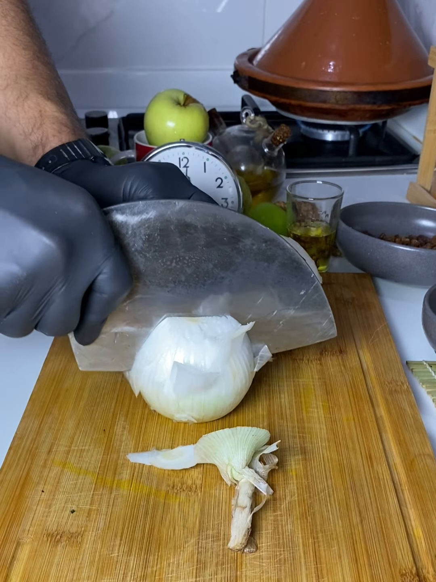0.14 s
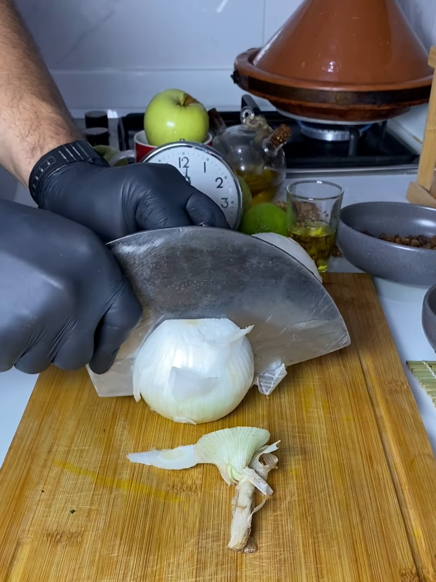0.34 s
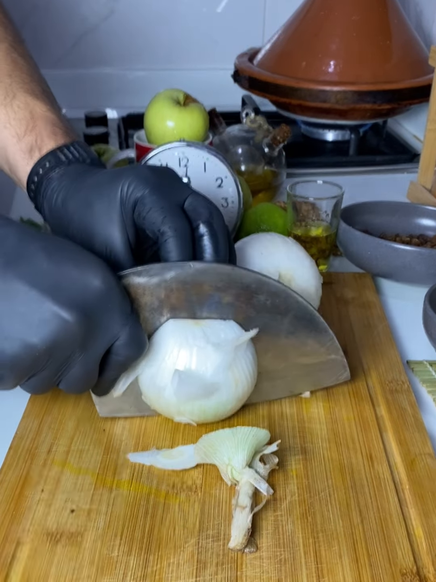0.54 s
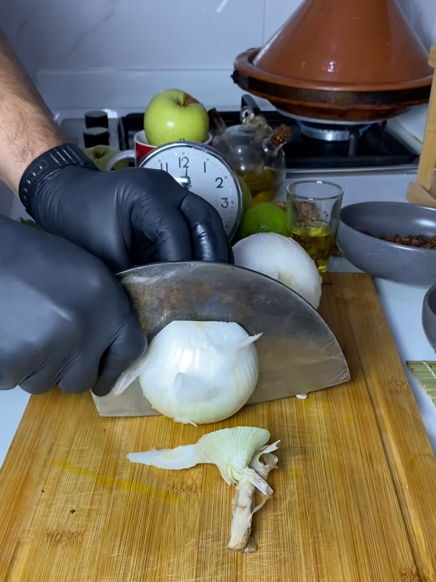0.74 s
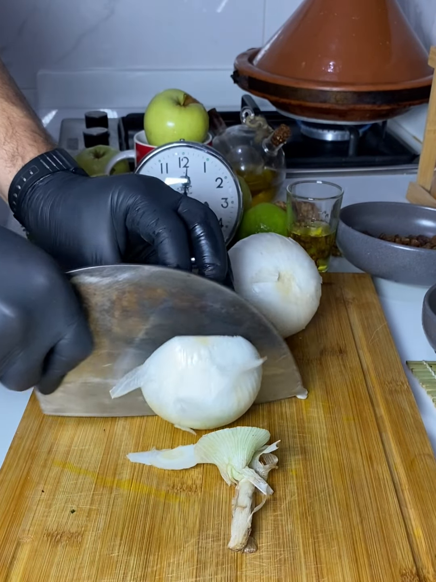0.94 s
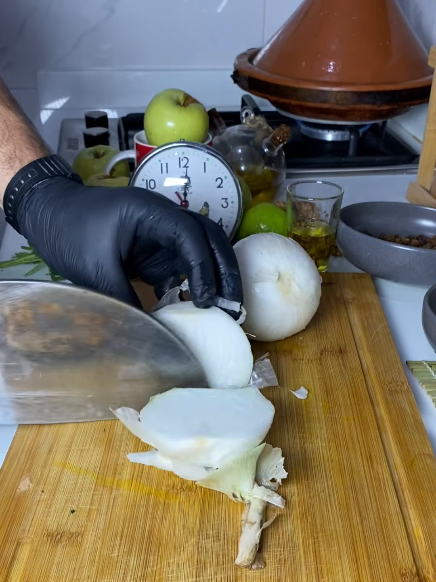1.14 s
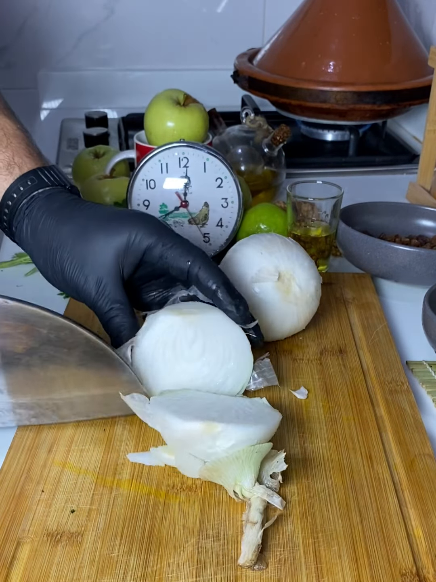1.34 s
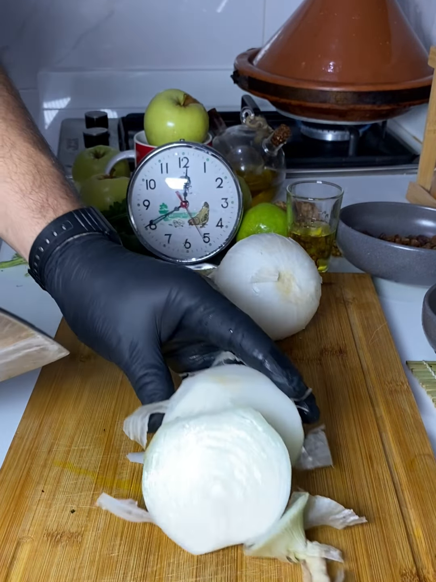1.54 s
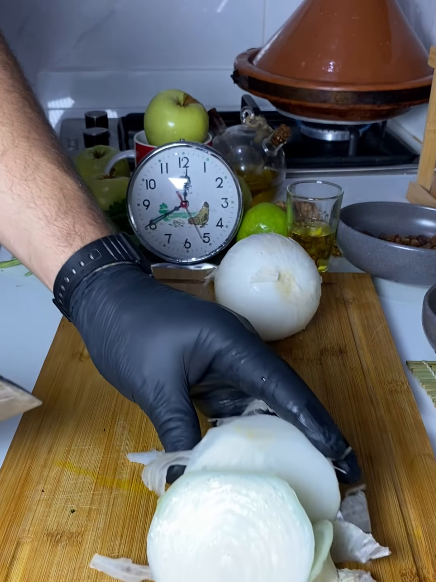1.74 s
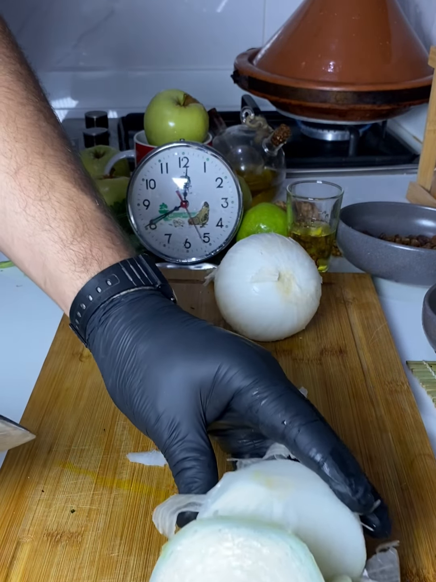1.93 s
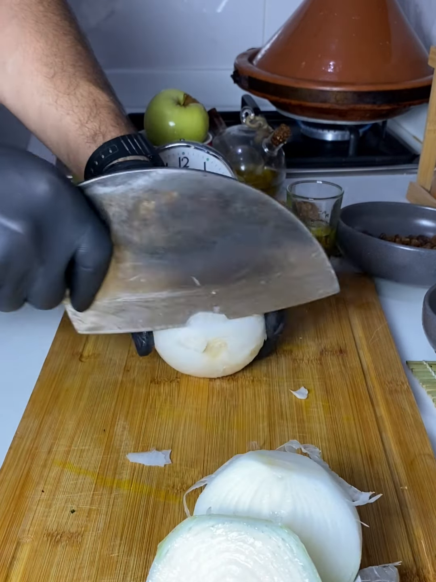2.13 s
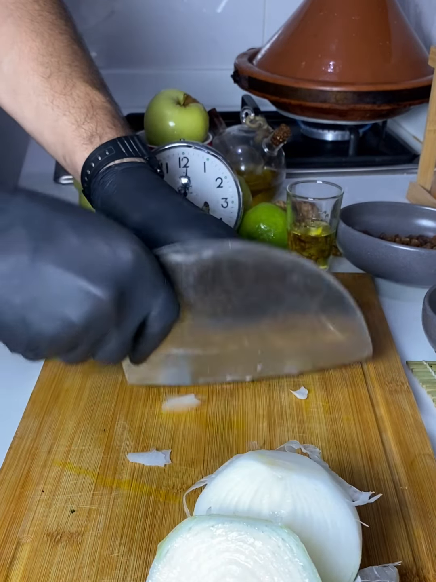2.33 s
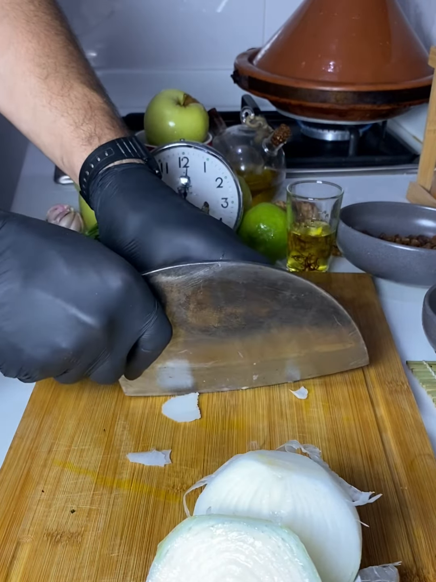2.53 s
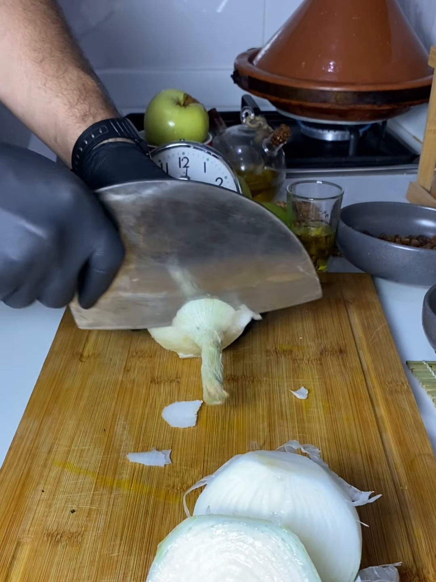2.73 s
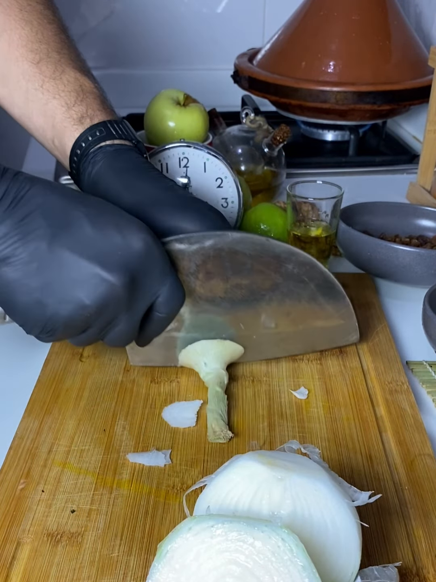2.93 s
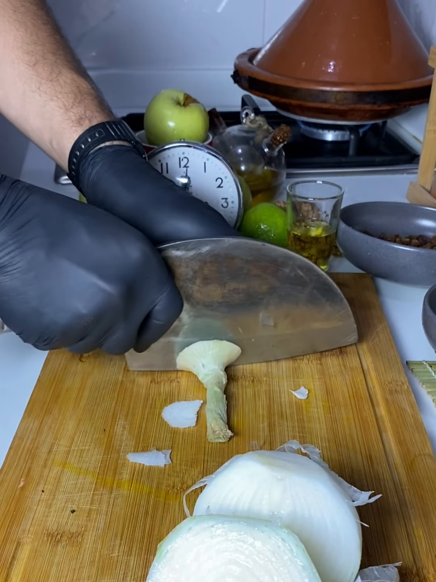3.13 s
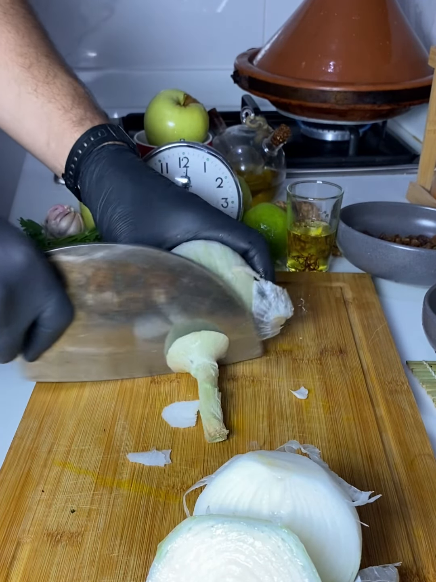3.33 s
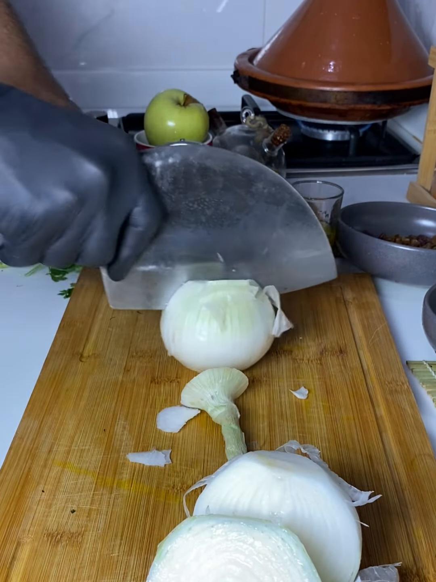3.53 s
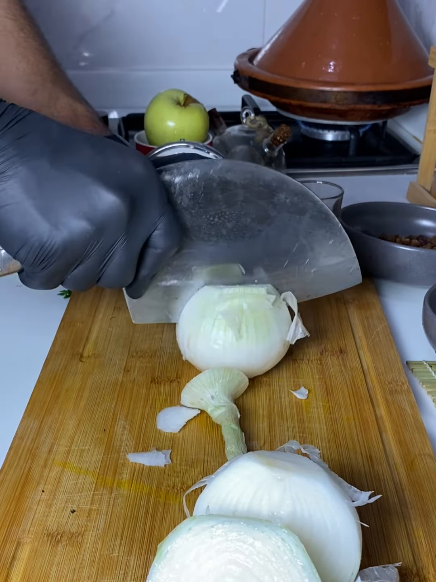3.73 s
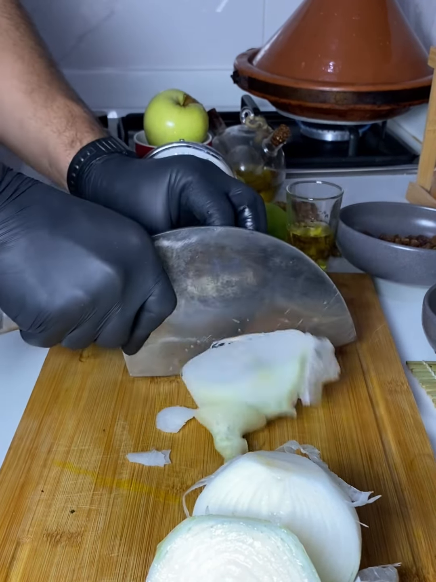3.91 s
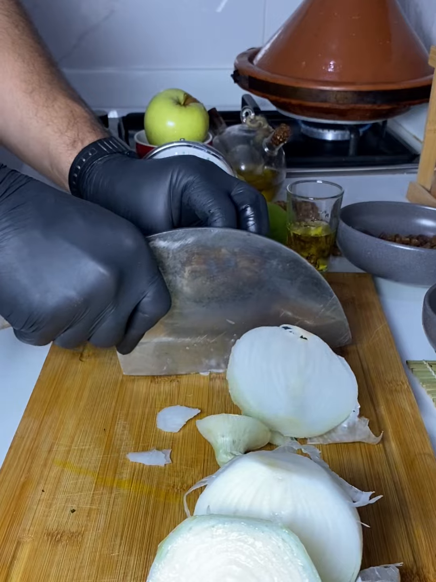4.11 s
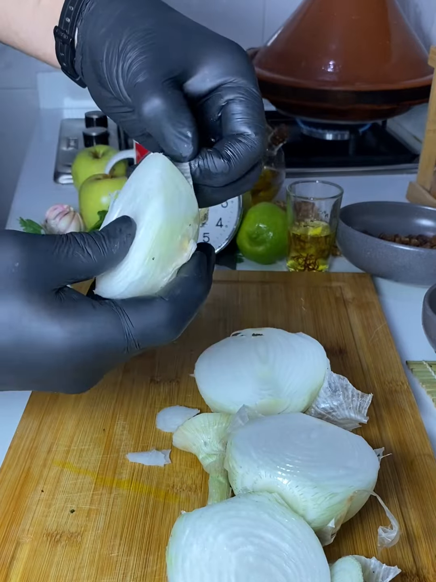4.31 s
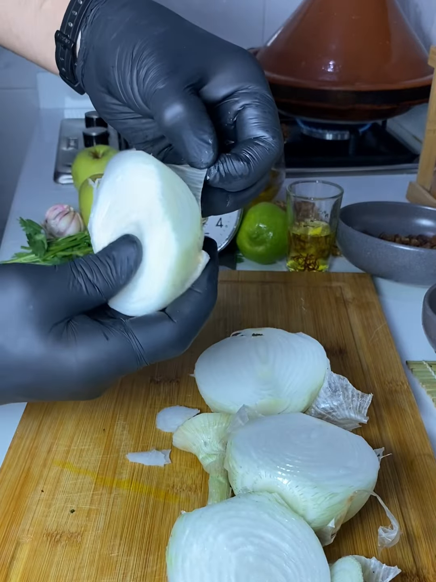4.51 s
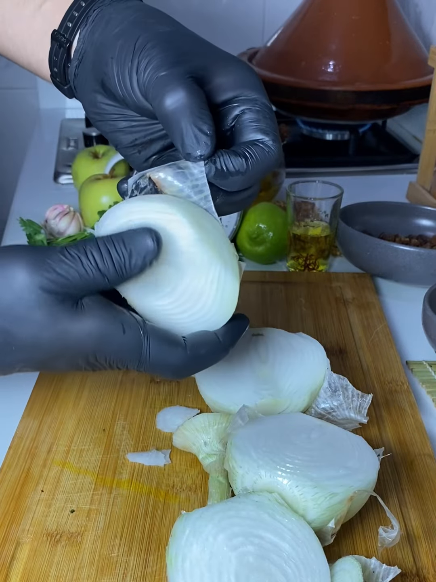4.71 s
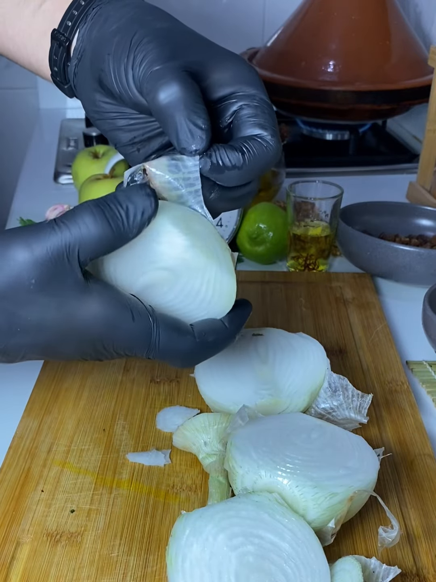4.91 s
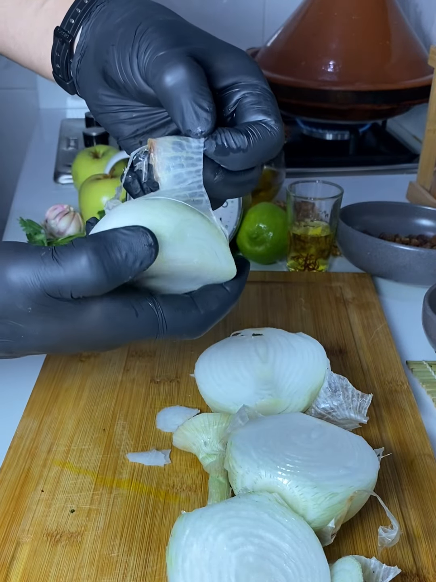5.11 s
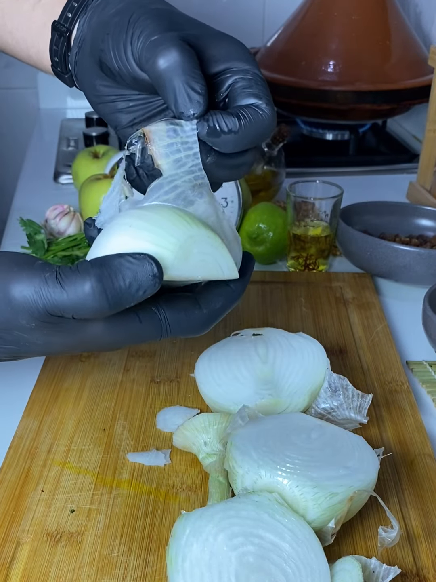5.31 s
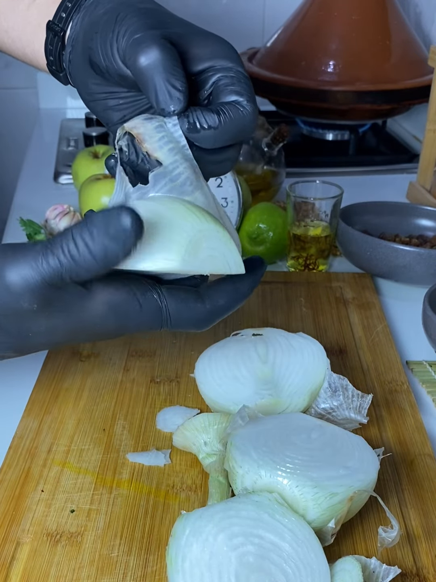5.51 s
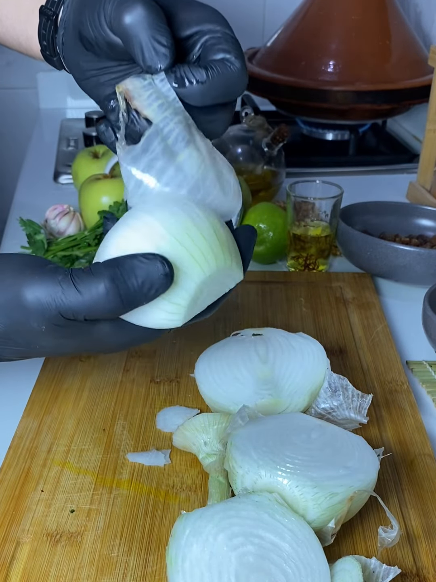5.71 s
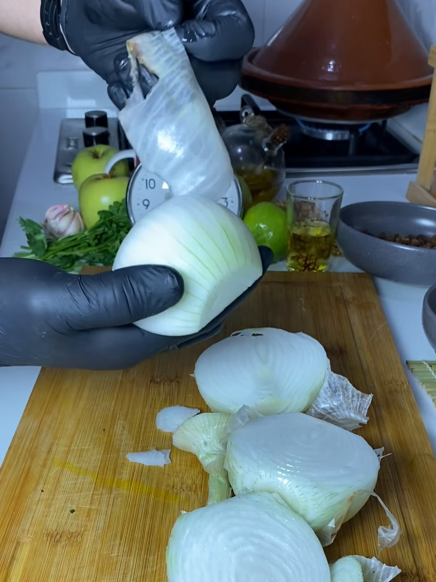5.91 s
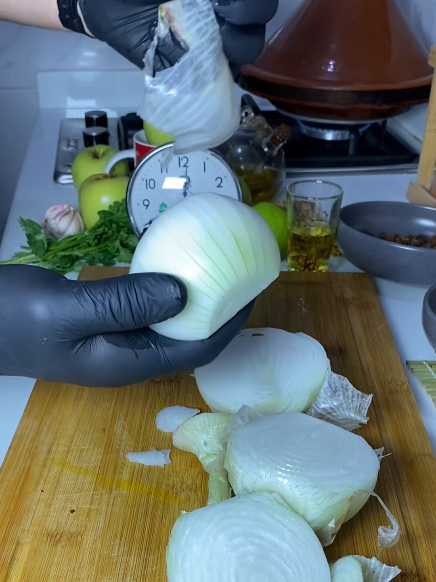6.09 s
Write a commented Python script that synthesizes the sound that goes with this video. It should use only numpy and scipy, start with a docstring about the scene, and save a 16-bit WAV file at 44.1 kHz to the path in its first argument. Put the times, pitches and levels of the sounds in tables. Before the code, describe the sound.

Close stereo pickup of onion cutting: wet, bright tearing and a low board hum lead into a loud woody chop, then dull bumps and rubbing as pieces are moved. Three further knocks come at uneven gaps, the last after a quick crisp slice. Almost silent peeling with papery crackles ends it, in a short-echo kitchen with low room air and several abrupt tiny gaps.

```python
"""A broad blade hisses through an onion, knocks on a wooden board and scrapes the slices aside in a kitchen;
later gloved hands peel the skin. The sound comes in seven stretches with brief silences between them.
Hiss, rustle and scrape are patchy noise shaped by spectra or resonances; knocks are sums of fading board modes.
A faint room tail and kitchen air lie around it. A limiter and a left-right difference shape the stereo result."""
import sys
import numpy as np
from scipy import signal
from scipy.fft import rfft, irfft, next_fast_len
from scipy.io import wavfile
from scipy.ndimage import uniform_filter1d, minimum_filter1d, map_coordinates

SR = 44100
rng = np.random.default_rng(int(sys.argv[2]) if len(sys.argv) > 2 else 0)


def transcribe(signal):
    """Save signal, clipped to [-1, 1], as a 16-bit WAV file at the path in sys.argv[1]."""
    frames = np.atleast_2d(signal).T
    limited = np.clip(frames, -1, 1)
    pcm = np.round(limited * 32767).astype(np.int16)
    wavfile.write(sys.argv[1], SR, pcm)


N = 271215


def amp(db):
    """Turns dB into a factor."""
    return 10 ** (np.asarray(db) / 20)


def unit(x):
    """Scales x to an average (RMS) level of 1."""
    return x / np.sqrt(np.mean(x ** 2) + 1e-20)


def along(points, hz):
    """Reads a curve of (Hz, value) points on a log frequency axis."""
    f, v = np.transpose(points)
    return np.interp(np.log(hz + 1), np.log(f + 1), v)


def filtered(x, response):
    """Shapes x by a response, real or complex, given as a function of frequency."""
    padded = next_fast_len(x.shape[-1] + SR // 8)
    spectrum = rfft(x, padded) * response(np.fft.rfftfreq(padded, 1 / SR))
    return irfft(spectrum, padded)[..., :x.shape[-1]]


def resonances(peaks):
    """Response of a body with (Hz, width Hz, dB) peaks; neighbours have opposite signs."""
    def response(f):
        total = 0
        for k, (centre, width, db) in enumerate(peaks):
            peak = 1j * f * width / (centre * centre - f * f + 1j * f * width)
            total = total + (-1) ** k * amp(db) * peak
        return total
    return response


def narrow(peaks):
    """Noise through the same resonances twice, so that it rings in steep-sided peaks."""
    return unit(filtered(rng.standard_normal((2, N)), lambda hz: resonances(peaks)(hz) ** 2))


FLUTTER_PER_S = 18  # random points per second: how fast levels waver


def flutter(depth_db, per_s=FLUTTER_PER_S):
    """A smooth random gain drawn through random points."""
    knots = rng.standard_normal(200)
    return amp(depth_db * map_coordinates(knots, [np.arange(N) * per_s / SR]))


DRIFT = .025  # typical share by which resonances wander in pitch as the contact moves


def drifting(x, order=3):
    """Plays x at a slowly wavering speed, so its resonances glide."""
    wander = np.log(flutter(depth_db=20 / np.log(10), per_s=7))
    at = np.cumsum(1 + DRIFT * wander)
    return np.array([map_coordinates(row, [at], order=order, mode="mirror") for row in x])


def friction(patchy_db, grains, size, per_s=300, order=256):
    """Two unrelated noises share patches of gain and a crackle of tiny slips.

    size is the patch size in frequency bins and time frames; order is the frame length in samples.
    """
    z = signal.stft(rng.standard_normal((2, N)), nperseg=order)[2]
    field = uniform_filter1d(rng.standard_normal(z.shape[1:]), size[0], axis=0)
    field = uniform_filter1d(field, size[1], axis=1)
    pair = signal.istft(z * amp(patchy_db * unit(field)), nperseg=order)[1][:, :N]
    slips = (rng.random(N) < per_s / SR) * amp(2.5 * rng.exponential(size=N))
    burst = signal.lfilter([1], [1, -amp(-60 / SR / .004)], slips)  # each slip fades 60 dB in 4 ms
    return unit(pair) * (1 + grains * burst)


# Stretches of sound with silence between them.
# Each row: start in seconds, end in seconds, fade-in in seconds.
STRETCHES = [(0, 0.732, 0.0006), (0.774, 1.397, 0.0046), (1.438, 2.119, 0.014), (2.16, 2.638, 0.013),
             (2.679, 3.438, 0.013), (3.475, 4.241, .01), (4.281, 6.193, 0.025)]


def in_stretch(s):
    """1 during the stretch of sound that holds the moment s, 0 elsewhere."""
    t = np.arange(N) / SR
    return sum((t >= a) & (t < b) for a, b, _ in STRETCHES if a <= s < b)


RISE_DB_PER_S, FALL_DB_PER_S = 1497, 351  # before the start and after the end of a stroke
TAIL_DB, TAIL_DB_PER_S = -14.5, 93.5  # the slower part of the letting go


def strokes(rows):
    """Each stroke swells to a peak, sags and lets go: one gain curve a row, and the columns after the sixth."""
    t = np.arange(N) / SR
    gains = np.zeros((len(rows), N))
    for gain, (start, swell_s, sag_s, db, swell_db, sag_db, *_) in zip(gains, rows):
        on = in_stretch(start) > 0
        peak = start + swell_s
        end = peak + sag_s
        after = np.maximum(t[on] - end, 0)
        held_db = np.interp(t[on], [start, peak, end], [db - swell_db, db, db - sag_db])
        held_db -= RISE_DB_PER_S * np.maximum(start - t[on], 0)
        release_db = np.maximum(-FALL_DB_PER_S * after, TAIL_DB - TAIL_DB_PER_S * after)
        gain[on] = amp(held_db + release_db)
    return gains, np.transpose(rows)[6:]


# Colour of the kitchen air. Each row: pitch in Hz, relative level per Hz in dB.
AIR_COLOUR = [(20, -22), (80, 3), (125, 0), (200, -15), (270, -10), (380, -14), (520, -27), (630, -21),
              (760, -31), (1000, -42), (2000, -52), (5000, -50), (9000, -52.5), (15000, -67.5)]


def kitchen_air():
    """The air of the room is a steady coloured noise whose level wavers slightly."""
    air = unit(filtered(rng.standard_normal((2, N)), lambda hz: amp(along(AIR_COLOUR, hz))))
    return amp(-56.5) * flutter(depth_db=1.5) * air


# A faint low hum that comes and goes. Each row: start in seconds, swell in seconds, sag in seconds,
# peak level in dB, rise during the swell in dB, drop during the sag in dB.
LOW_HUMS = [(4.34, .07, .05, -62, 5, 4), (4.84, .03, .03, -67, 3, 3), (5.34, .03, .03, -65, 3, 3),
            (5.53, .16, .07, -62, 7, 3), (6.04, .06, .05, -62, 6, 0)]
# Its pitch. Each row: centre in Hz, width in Hz before the filter is applied twice, level in dB.
LOW_HUM_PITCH = [(265, 40, 0)]


def low_hums():
    """A faint low hum is narrow noise that swells and sags."""
    return strokes(LOW_HUMS)[0].sum(axis=0) * narrow(LOW_HUM_PITCH)


# How long the room rings. Each row: pitch in Hz, time to fade by 60 dB in seconds.
ROOM_FADE = [(100, 0.81), (500, 0.23), (1500, 0.2), (3000, 0.15), (8000, 0.29)]


def room(x):
    """Two unrelated noise tails, 300 samples late; each frequency dies at its own speed."""
    hz, t, z = signal.stft(rng.standard_normal((2, SR // 2)), SR, nperseg=256)
    fade = amp(-60 * t / along(ROOM_FADE, hz)[:, None])
    tail = signal.istft(z * fade, SR, nperseg=256)[1]
    tail = tail / np.linalg.norm(tail[0])
    return signal.fftconvolve(np.pad(x, (300, 0))[None], tail, axes=1)[:, :N]


# The board on the counter. Each row: pitch in Hz, width in Hz, level in dB.
# The filter is applied twice, which narrows the peaks and doubles the level differences.
COUNTER_MODES = [(160, 40, -3.5), (203, 40, -1), (290, 110, -2.5)]


def board_drone():
    """Patchy friction noise makes the board drone low on the counter."""
    noise = friction(patchy_db=2.5, grains=0.11, size=(2, 16))
    return unit(filtered(noise, lambda hz: resonances(COUNTER_MODES)(hz) ** 2))


# The board's mode under a pressing blade.
# Each row: pitch in Hz, width in Hz before the filter is applied twice, level in dB.
PRESSED_MODE = [(210, 30, 0)]


def board_hum():
    """The pressed board hums as noise in one narrow mode."""
    return narrow(PRESSED_MODE)


# The board under a sliding edge. Each row: pitch in Hz, width in Hz, level in dB.
SLIDING_MODES = [(333, 46, -6), (694, 300, -5), (1110, 80, -1), (1440, 240, -12)]


def wood_rub():
    """Sliding friction excites the modes of the wood."""
    noise = friction(patchy_db=5.0, grains=0.2, size=(2, 10), order=1024)
    return unit(filtered(noise, resonances(SLIDING_MODES)))


# Modes that a sliding contact makes sing.
# Each row: pitch in Hz, width in Hz before the filter is applied twice, level in dB.
SINGING_MODES = [(489, 45, 0), (623, 65, 0), (782.6, 50, 0)]


def singing(gains):
    """The sliding contact sings in narrow modes that glide, each with its own gain."""
    return sum(gain * drifting(narrow([mode]), order=1) for gain, mode in zip(gains, SINGING_MODES))


# The broad blade. Each row: pitch in Hz, width in Hz, level in dB.
BLADE_MODES = [(2150, 160, 0), (2560, 170, 3), (2980, 88, 0), (3220, 45, -5), (3770, 60, -10),
               (4150, 90, -8), (4420, 90, -8), (5200, 120, -14), (6383, 150, -14), (7430, 170, -18)]


def blade_ring():
    """Friction excites the blade's modes, which glide as the contact moves."""
    noise = friction(patchy_db=4.0, grains=.3, size=(2, 10), order=1024)
    return drifting(unit(filtered(noise, resonances(BLADE_MODES))))


# Pitches that the tiled corner lifts in hiss and rustle. Each row: pitch in Hz, width in Hz, lift in dB.
CORNER_PEAKS = [(1280, 290, 7.5), (2215, 200, 7.5), (2640, 100, 5.5), (3160, 110, 4.5), (3800, 70, 2.5),
                (4270, 330, 4), (5400, 88, 1.5), (6000, 200, 1.5)]


def lifted(spectrum):
    """A smooth spectrum with the tiled corner's peaks on it."""
    def response(hz):
        lift_db = sum(db / (1 + (2 * (hz - c) / w) ** 2) for c, w, db in CORNER_PEAKS)
        return amp(along(spectrum, hz) + lift_db)
    return response


# Gloves and dry skin, before the corner's lift. Each row: pitch in Hz, relative level per Hz in dB.
RUSTLE_COLOUR = [(700, -18.5), (1400, -6), (1800, -3.5), (2400, -2), (3000, -5), (3700, -10), (5000, -13.5),
                 (8000, -2), (11000, -20.5), (13500, -26.5), (15200, -17.5), (16000, -20)]


def glove_rustle():
    """Gloves and dry skin rustle as patchy noise with sparse, strong crackles."""
    noise = friction(patchy_db=3.5, grains=1.2, per_s=150, size=(3, 9), order=768)
    return unit(filtered(noise, lifted(RUSTLE_COLOUR)))


# Tearing onion, before the corner's lift. Each row: pitch in Hz, relative level per Hz in dB.
HISS_COLOUR = [(900, -22), (1300, -6), (1750, -10), (2200, -5), (3200, -4), (4300, -2), (5500, -3),
               (8000, -8), (10000, -15), (13000, -28), (16000, -29)]


def onion_hiss():
    """Tearing cells hiss as bright, patchy noise whose colour glides."""
    noise = friction(patchy_db=2.6, grains=.5, size=(3, 6), order=512)
    return unit(drifting(filtered(noise, lifted(HISS_COLOUR))))


RUSTLE_FLUTTER_DB, RUB_FLUTTER_DB, DRONE_FLUTTER_DB = 2.47, 1.33, 2.5
IDLE_DRONE_DB, IDLE_RUB_DB = -67, -78.5  # the board is never quite still
CUT_DRONE_DB, CUT_RUSTLE_DB = -9, -11.5  # drone over the hum; rustle over the hiss
CUT_SING_DB, SETTLE_SING_DB = (-12, -8, 1), (-4, -3, -10)  # three singing modes over the rub
CUT_STEEL_DB, SETTLE_STEEL_DB = -22, -14  # blade ring over the rub: during a cut; in settling and idle rub
DRONE_DB_PER_S, RUB_DB_PER_S = 74.5, 57.5  # how fast they fade after a blow
SETTLE_RISE_S = .008  # how long the rumble takes to set in
# In the next four tables each stroke row opens with: start in seconds, swell in seconds, sag in seconds,
# peak level in dB, rise during the swell in dB, drop during the sag in dB.
# Blade pushed through the onion, peak level of the hiss. Then: board hum and rub, both in dB over the hiss.
CUT_STROKES = [(0, 0.006, 0.034, -40.5, 1.5, 2, -4, -11.5), (.05, .15, .04, -38.5, 3, 1, -8, -12),
               (.245, .03, .045, -39, 2, 6, -8, -13.5), (.345, 0.0089, 0.027, -53, 0, 6.5, -4, -11),
               (.397, 0.0036, 0.013, -46.5, 0.5, 6, -6, -12.5), (.445, 0.006, 0.015, -54.5, 2, 4, -3, -12),
               (.478, 0.054, 0.02, -29, 14, 5, -12, -8.5), (2.17, 0.13, 0.055, -55, 5, 6, -1, -7),
               (2.70, 0.17, 0.11, -44, 10, 10.5, -8, -7), (3.49, 0.09, 0.048, -46.5, 6, 8.5, -0.5, -9),
               (3.755, 0.072, 0.0089, -25, 23, 8.5, -16, -17)]
# Blade or slices dragged over wood, peak level of the rub.
# Then: rustle, blade and the three singing modes, all in dB over the rub.
DRAG_STROKES = [(0.84, 0.065, .02, -46, 11, 3, -24, -19, -14, 5, -2),
                (.94, .03, .03, -49, 3, 3, -20, -17, -8, -2, 6),
                (1.0, .04, .135, -48, 5.5, 1, -24, -17, 4, 0, -3),
                (1.2, .04, .105, -52, 4.5, 4.5, -20, -11, -2, -1, 1),
                (1.438, 0.104, .46, -59.5, 1, 3, 0.5, -20, -3, -3, -8),
                (2.502, .09, .05, -46, 14, 2.5, -26, -21, -10, 2, 1),
                (3.151, .04, .035, -48, 9, 2, -24, -18, -8, -2, 0),
                (3.24, 0.072, .022, -41, 4, 2.5, -27, -10, -12, -4, 2),
                (3.355, 0.035, .01, -43, 3, 2.5, -29, -14, -4, 4, -4),
                (3.408, .015, .02, -46, 1.5, 3, -24, -15, 1, -5, -8),
                (4.1, .07, .03, -46.5, 12, 1, -30, -18, -10, 0, 4),
                (4.21, .015, .02, -43.5, 4, 0, -30, -18, -10, 6, 2)]
# Gloves on onion skin, peak level of the rustle. Then: hiss in dB over the rustle.
PEEL_STROKES = [(3.15, 0.015, 0.036, -69, 10, 3, -2), (3.232, 0.0067, 0.07, -53, 3, 13, 0),
                (4.3, 0.082, 0.084, -72.5, 3.5, 0, -7), (4.58, 0.134, 0.079, -73.5, 11, 2.5, 0.5),
                (4.9, 0.085, 0.23, -82, -1, -1.5, -4), (5.21, .01, 0.071, -69, -1, 5.5, -1),
                (5.48, 0.144, 0.063, -70.5, 16, 3, 2), (5.7, .045, 0.034, -63, 8.5, 3, -6),
                (5.795, 0.044, 0.045, -63, 5, 5, -6), (5.9, 0.03, .06, -74, 0, 3.5, -2)]
# The pressing blade makes the board hum clearly, peak level of the hum. No further columns.
PRESS_HUMS = [(.14, .015, .02, -47, 3, 4), (.25, .025, .025, -39, 6, 5), (.497, .025, .02, -33, 7, 6),
              (3.775, .025, .008, -33, 6, 2)]
# Board and onion halves rumble on after a blow. Each row: start in seconds, drone level in dB, rub level in dB.
RUMBLES = [(.575, -39.5, -40.5), (.785, -55, -50), (2.39, -41, -44), (3.0, -37.5, -48), (3.86, -37.5, -41)]


def gestures():
    """Cuts, drags, peels and settling set gains of hiss, rustle, rub, singing modes, blade, drone and hum."""
    t = np.arange(N) / SR
    cut, (hum_db, cut_rub_db) = strokes(CUT_STROKES)
    drag, (drag_rustle_db, drag_steel_db, *drag_sing_db) = strokes(DRAG_STROKES)
    peel, (peel_hiss_db,) = strokes(PEEL_STROKES)
    cut_hiss, peel_rustle, drag_rub = cut.sum(axis=0), peel.sum(axis=0), drag.sum(axis=0)
    cut_rub = amp(cut_rub_db) @ cut

    at, settle_drone_db, settle_rub_db = np.transpose(RUMBLES)
    since = np.abs(t - at[:, None])
    on = np.array([in_stretch(s) * np.clip((t - s) / SETTLE_RISE_S, 0, 1) for s in at])
    settle_rub = amp(settle_rub_db) @ (on * amp(-RUB_DB_PER_S * since)) + amp(IDLE_RUB_DB)
    settle_drone = amp(settle_drone_db) @ (on * amp(-DRONE_DB_PER_S * since))

    sing = amp(drag_sing_db) @ drag
    sing = sing + np.outer(amp(CUT_SING_DB), cut_rub) + np.outer(amp(SETTLE_SING_DB), settle_rub)
    steel = amp(drag_steel_db) @ drag + amp(CUT_STEEL_DB) * cut_rub + amp(SETTLE_STEEL_DB) * settle_rub
    hiss = cut_hiss + amp(peel_hiss_db) @ peel
    rustle = peel_rustle + amp(drag_rustle_db) @ drag + amp(CUT_RUSTLE_DB) * cut_hiss
    hum = amp(hum_db) @ cut * flutter(DRONE_FLUTTER_DB) + strokes(PRESS_HUMS)[0].sum(axis=0)
    drone = amp(CUT_DRONE_DB) * hum + settle_drone + amp(IDLE_DRONE_DB)
    rub = cut_rub + settle_rub + drag_rub

    uneven = flutter(RUB_FLUTTER_DB)  # rub, singing and blade waver together
    rustle = rustle * flutter(RUSTLE_FLUTTER_DB)
    drone = drone * flutter(DRONE_FLUTTER_DB)
    return hiss, rustle, rub * uneven, sing * uneven, steel * uneven, drone, hum


def handwork():
    """Cells tear with a hiss, gloves rustle, the blade rubs the wood and sings, the pressed board drones."""
    hiss_gain, rustle_gain, rub_gain, sing_gains, steel_gain, drone_gain, hum_gain = gestures()
    board = drone_gain * board_drone() + hum_gain * board_hum()
    sliding = rub_gain * wood_rub() + singing(sing_gains) + steel_gain * blade_ring()
    return board + sliding + rustle_gain * glove_rustle() + hiss_gain * onion_hiss()


# Small snaps of onion skin and glove. Each row: start in seconds, peak level in dB, centre pitch in Hz.
SKIN_SNAPS = [(0.3541, -40, 4080), (.375, -45.5, 7580), (0.402, -38, 3952), (0.4535, -41, 4410),
              (0.4853, -25, 1963), (1.53, -51.5, 4000), (3.152, -50, 2192), (3.1727, -40.5, 4500),
              (3.2315, -30, 2100), (3.2325, -30, 2850), (3.2345, -33, 6500), (3.5853, -47.5, 4290),
              (3.756, -31.5, 4400), (4.5977, -54, 6000), (4.7121, -53, 2170), (4.724, -57, 3000),
              (4.735, -56, 2400), (5.043, -62, 5500), (5.214, -43.5, 4000), (5.247, -49, 4500),
              (5.542, -60, 2300), (5.606, -57, 2600), (5.656, -55, 2200), (5.7427, -51, 2220),
              (5.757, -56, 2500), (5.771, -54, 2200), (5.8, -57, 2300), (5.828, -50, 2320),
              (5.846, -56, 2900), (5.97, -63, 6800)]


def snaps():
    """Each snap is a short puff of noise around its own pitch."""
    out, t = np.zeros(N + SR), np.arange(SR // 20) / SR
    for s, db, hz in SKIN_SNAPS:
        noise = rng.standard_normal(len(t)) * amp(-60 * t / 0.010)  # fades 60 dB in 10 ms
        puff = filtered(noise, lambda f: resonances([(hz, 0.6 * hz, 0)])(f) ** 2)
        out[round(s * SR):][:len(t)] += amp(db) * puff / np.abs(puff).max()
    return out[:N]


FAVOUR_DB, FAVOUR_OCTAVES = 9.5, 0.4  # how much and how widely a spot favours modes near its pitch
CRACK_T60_S = 0.012  # time for the crack's noise to fade by 60 dB
# Modes of the struck board. Each row: pitch in Hz, level in dB, time to fade by 60 dB in seconds.
BOARD_MODES = [(45, -5, .07), (82, -5, 0.07), (156.1, -11, 0.05), (201.5, -6, 0.06), (271.3, -11, .045),
               (333, -10, 0.056), (400.5, -10.5, 0.044), (462, -7, 0.04), (530, 2, .042), (621, -4, 0.035),
               (755, -2, 0.033), (854, -6.5, 0.022), (981, -6.5, 0.03), (1117, -4.5, 0.018),
               (1510, -3.5, 0.015), (1996, -11, .016), (2840, -10.5, 0.015)]
# Blade contacts on the board. Each row: start in seconds, peak level of the ring in dB, contact time in
# milliseconds, favoured pitch in Hz, crack level over the ring in dB, crack centre in Hz.
BLADE_CONTACTS = [(.5475, -18.5, 0.36, 800, -11, 2300), (.5518, -6.5, 0.33, 950, -3, 1800),
                  (0.5546, -6, 0.38, 760, -28, 2000), (.5575, -2, 0.6, 150, -30, 2000),
                  (.562, -5, .8, 536, -25, 2000), (.576, -17, .9, 536, -20, 2000),
                  (.782, -38, 1.2, 300, -25, 1500), (.808, -38, 1.5, 120, -30, 1500),
                  (.826, -40, 1.2, 300, -30, 1500), (2.346, -33, 0.68, 700, -12, 2200),
                  (2.3547, -23, .5, 755, -7, 2000), (2.3621, -5, 0.37, 900, -2, 2000),
                  (2.3678, -7.5, 0.76, 203, -24, 2500), (2.373, -6, 0.75, 540, -28, 2000),
                  (2.3775, -8, 1.2, 520, -25, 2000), (2.452, -29, 1.6, 300, -30, 2000),
                  (2.503, -31, 1.5, 200, -30, 2000), (2.9695, -17, 1.2, 760, -16, 2300),
                  (2.973, -3, 1.0, 780, -34, 1600), (2.979, -8, 1.06, 206, -28, 1600),
                  (2.986, -9, 1.26, 207, -28, 2600), (3.034, -28, 1.2, 615, -32, 2000),
                  (3.059, -27.5, 2, 270, -32, 2000), (3.245, -33, 1.5, 200, -30, 2000),
                  (3.818, -21.5, .8, 618, -12, 2500), (3.8245, -5, .6, 520, -13, 2800),
                  (3.8275, -4, 0.32, 500, -10, 1500), (3.8324, -7, 0.33, 1020, -10, 3300),
                  (3.8365, -5, .6, 120, -16, 2000), (3.8432, -5, 0.68, 536, -25, 2000),
                  (3.863, -20, 1, 460, -25, 1200), (3.887, -24, 1.4, 200, -30, 1500),
                  (3.924, -28, 1.3, 460, -25, 1500)]


def chops():
    """The curved edge rolls down in a few contacts; each spot favours its own modes, soft ones lose the treble."""
    out, t = np.zeros((2, N + SR)), np.arange(SR // 8) / SR
    hz, level_db, t60 = np.transpose(BOARD_MODES)[:, :, None]
    for s, db, contact_ms, spot_hz, crack_db, crack_hz in BLADE_CONTACTS:
        strength, detune, turn = rng.standard_normal((3, len(BOARD_MODES), 1))
        favour_db = FAVOUR_DB * np.exp(-(np.log2(hz / spot_hz) / FAVOUR_OCTAVES) ** 2)
        fading = amp(level_db + favour_db + 1.3 * strength - 60 * t / t60)
        softness = 1 + (hz * contact_ms / 1000) ** 4
        # low modes take longer to build, so the knock seems to drop in pitch
        build_up = (1 - np.exp(-t * hz / .62)) ** 2
        shape = fading / softness * build_up
        # each mode is mistuned a little at random for every contact
        phase = 2 * np.pi * hz * (1 + .02 * detune) * t
        shared_ring = (shape * np.sin(phase)).sum(axis=0)
        apart_ring = (shape * np.sin(phase + np.pi * turn)).sum(axis=0)
        ring = np.array([shared_ring, apart_ring])

        splinters = rng.standard_normal((2, len(t))) * amp(-60 * t / CRACK_T60_S)
        splinters = splinters * (1 - np.exp(-t / .0008))
        crack = filtered(splinters, lambda f: resonances([(crack_hz, .7 * crack_hz, 0)])(f) ** 3)
        knock = ring / np.abs(ring[0]).max() + amp(crack_db) * crack / np.abs(crack[0]).max()
        out[:, round(s * SR):][:, :len(t)] += amp(db) * knock
    return out[:, :N]


def scene():
    """Row 0 is the share common to left and right, row 1 is the share in which they differ."""
    hits = chops() + snaps() * [[1], [0]]
    background = kitchen_air() + low_hums() + amp(-15.5) * room(hits[0])
    return background + handwork() + hits


def limited(x):
    """Gain control turns both channels down together around peaks above 0.95."""
    need = np.minimum(1, .95 / (np.abs(x).max(axis=0) + 1e-9))
    return x * uniform_filter1d(minimum_filter1d(need, size=161), size=81)


TOP_HZ = 15850  # nothing passes above this pitch
# How alike left and right are. Each row: pitch in Hz, likeness where 1 means the same before lead and tilt.
CHANNEL_LIKENESS = [(100, .97), (200, .92), (330, .65), (1000, .7), (4000, .8), (7000, .88), (8400, .999),
                    (11800, .999), (14000, .65)]
# How far the left channel leads. Each row: pitch in Hz, lead in radians.
LEFT_LEAD = [(0, 0), (170, -.45), (430, -1.6), (950, -2.9), (2000, -4.5), (3000, -4), (4300, -4.7),
             (6000, -4.4), (8400, -np.pi), (11800, -np.pi), (14800, -1.3), (16400, 0)]
# Level difference of the channels. Each row: pitch in Hz, left minus right in dB.
LEFT_TILT = [(60, 0), (150, -4), (350, -4.5), (700, -2), (1500, -1.5), (2800, -1), (5000, 0.1),
             (7500, -1.5), (8400, 0), (11800, 0), (15000, -1)]


def record(dry):
    """Left and right differ in phase and level, opposite from 8.4 to 11.8 kHz; silence parts the stretches."""
    def turn(hz):
        return np.arccos(np.clip(along(CHANNEL_LIKENESS, hz), 0, 1)) / 2

    shared, apart = filtered(dry, lambda hz: np.array([np.cos(turn(hz)), np.sin(turn(hz))]))
    lead_hz, lead = np.transpose(LEFT_LEAD)
    side = np.array([[.5], [-.5]])  # half of each difference goes to each channel

    def channel_response(hz):
        return amp(side * along(LEFT_TILT, hz)) * np.exp(1j * side * np.interp(hz, lead_hz, lead))

    channels = filtered(np.array([shared + apart, shared - apart]), channel_response)
    t = np.arange(N) / SR
    gate = np.zeros(N)
    for start, end, fade in STRETCHES:
        fade_in = np.clip((t - start) / fade, 0, 1) ** 2
        fade_out = np.clip((end - t) / 0.0025, 0, 1) ** 2
        gate += fade_in * fade_out
    return filtered(limited(channels) * gate, lambda hz: hz < TOP_HZ)


dry = scene()
out = record(dry)
transcribe(out)
```